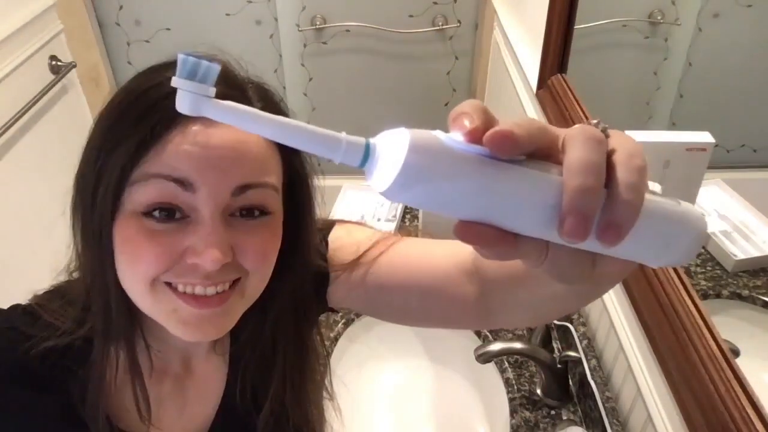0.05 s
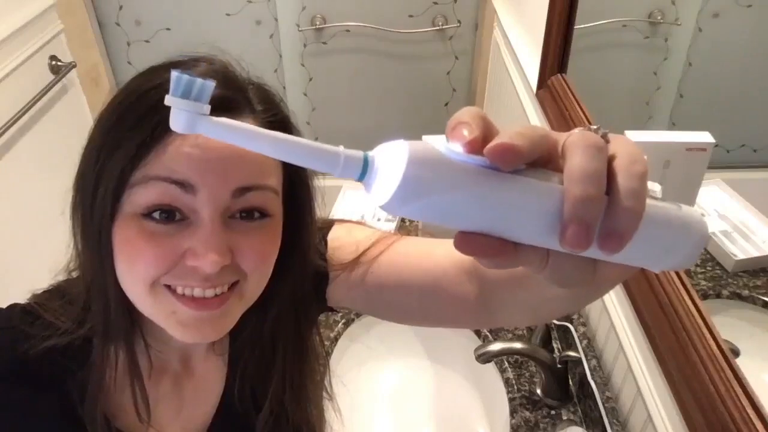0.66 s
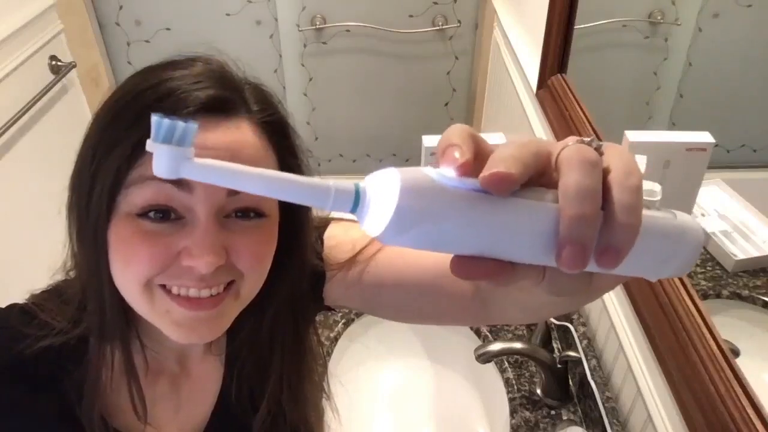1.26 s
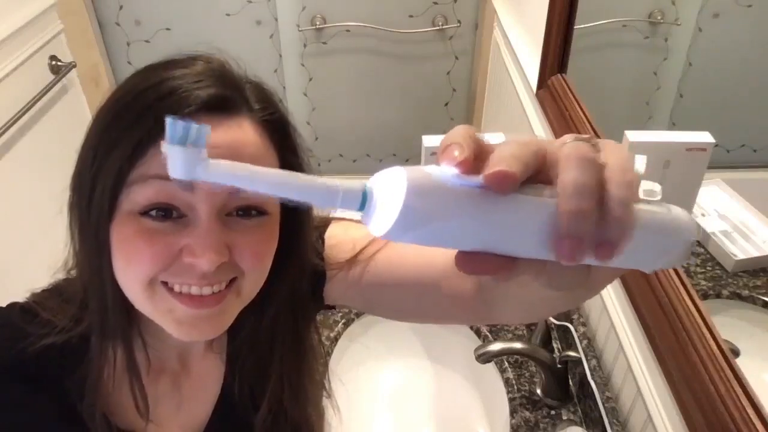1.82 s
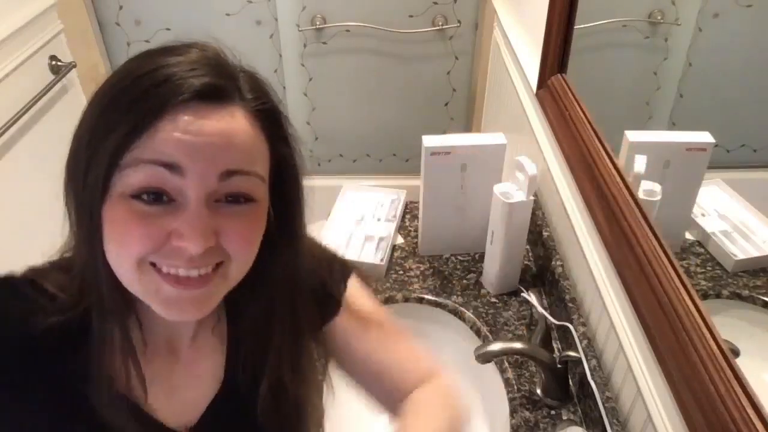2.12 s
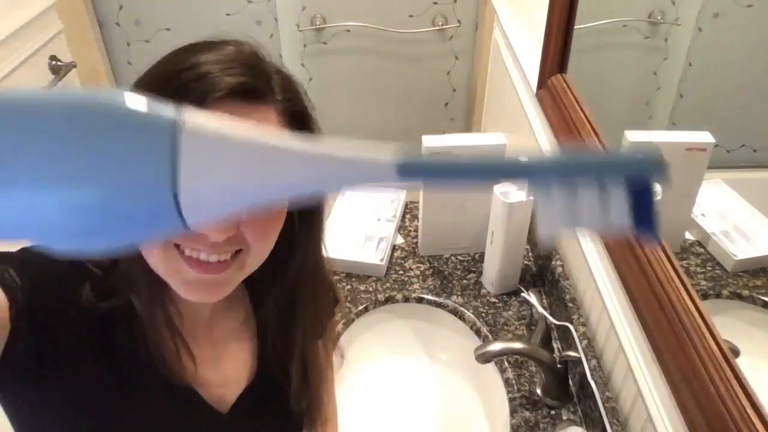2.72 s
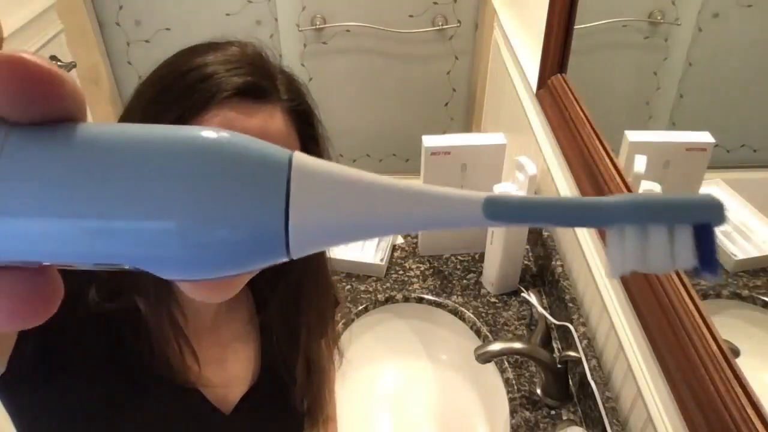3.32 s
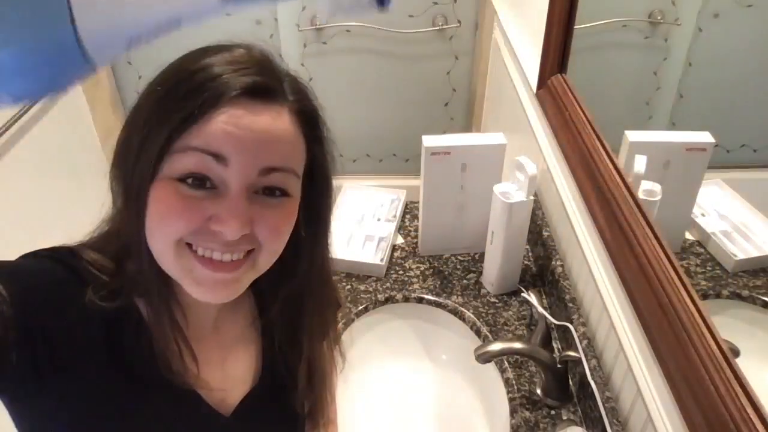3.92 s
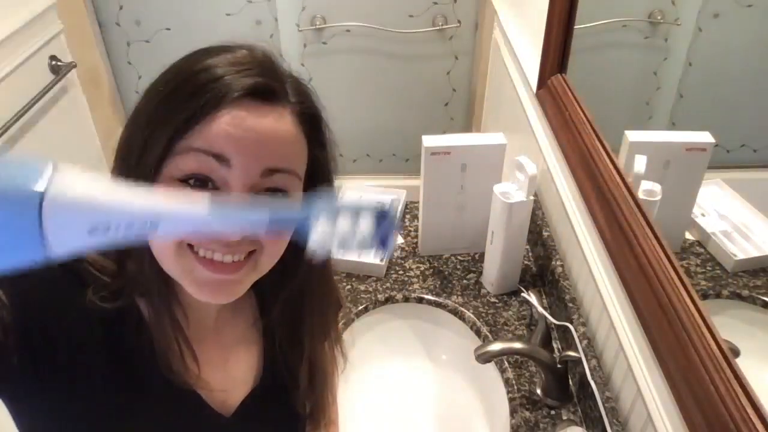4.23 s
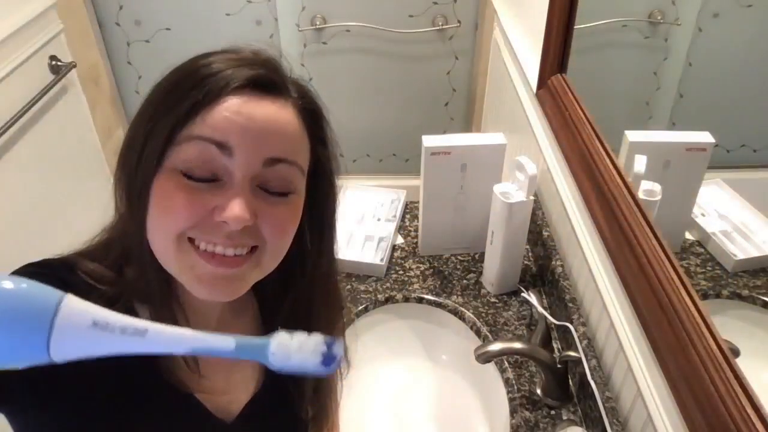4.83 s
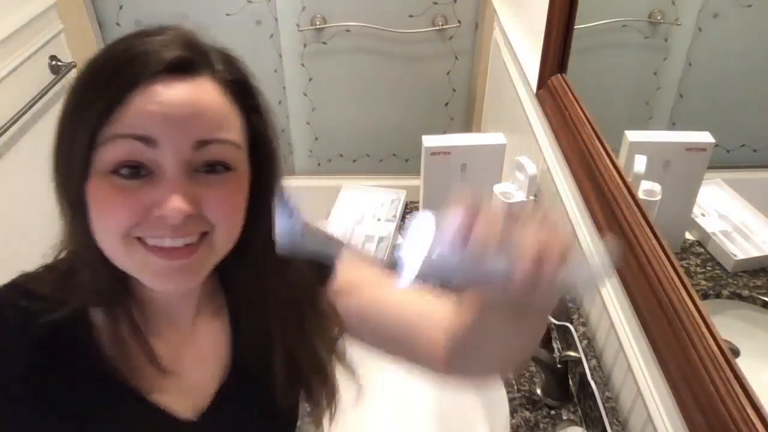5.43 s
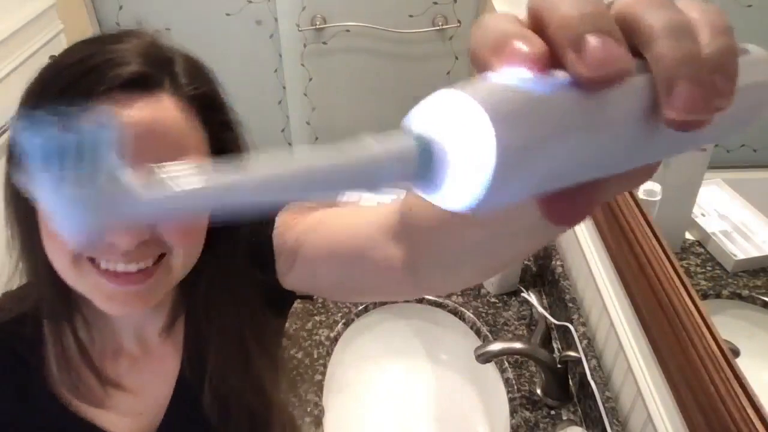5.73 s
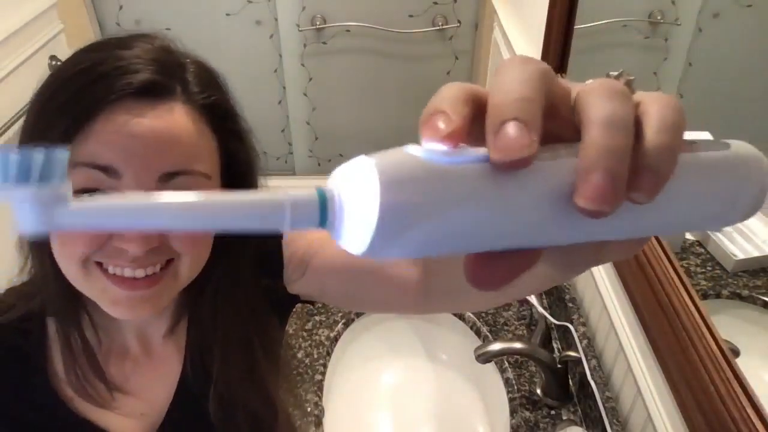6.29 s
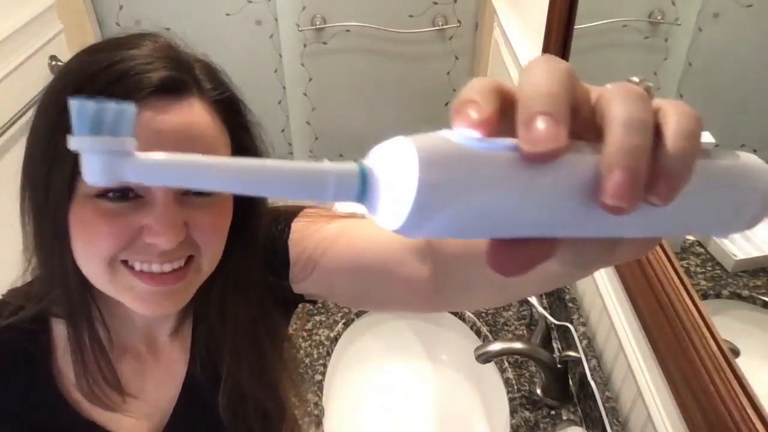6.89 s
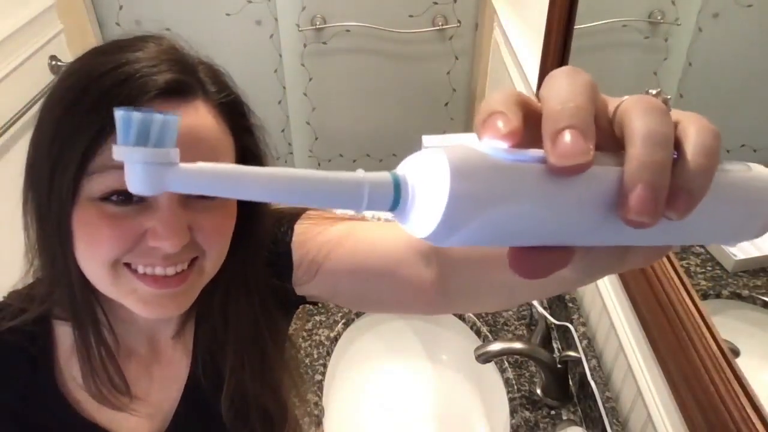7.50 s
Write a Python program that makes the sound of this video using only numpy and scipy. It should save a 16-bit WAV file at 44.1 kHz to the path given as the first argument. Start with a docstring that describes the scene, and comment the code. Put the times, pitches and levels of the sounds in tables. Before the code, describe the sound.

Two electric toothbrushes run throughout in a small tiled bathroom, over a faint low rumble. From the start, one is close to the microphone, giving a loud, even buzz made of very fast rattling and clicking, with a motor hum and a slight throb. At about 2 seconds it is lowered and becomes much quieter, duller and more echoing. From about 2.3 seconds the second toothbrush comes forward with a thin, high whine, softer than the first brush. Its pitch holds steady, but its tone shifts as it is moved, sharpest around 4 seconds, with a brief dip just after. The first brush keeps buzzing behind it. At about 5.4 seconds the whine recedes and the rattling brush swells back. By about 5.8 seconds it is closer, fuller and louder than at first, and it continues until the end, near 7.5 seconds.

```python
"""A small tiled bathroom: two electric toothbrushes run over a low rumble and take turns up close.
A geared brush rattles, clicks and hums as teeth, shaft and head knock and ring its casing; its motor
turns 25 times to 11 turns of the crown wheel, so the rattle throbs. It is lowered while a sonic brush
is held up, whining mainly on the odd harmonics of its magnetic drive, and then comes back closer."""
import sys
import numpy as np
from scipy import signal
from scipy.fft import rfft, irfft
from scipy.io import wavfile
from scipy.ndimage import map_coordinates

SR = 44100
rng = np.random.default_rng(int(sys.argv[2]) if len(sys.argv) > 2 else 0)


def dump(signal):
    """Clip the signal to [-1, 1] and save it as 16-bit WAV at the path in sys.argv[1]."""
    limited = np.clip(np.atleast_2d(signal).T, -1, 1)
    pcm = np.round(limited * 32767).astype(np.int16)
    wavfile.write(sys.argv[1], SR, pcm)


N = 332955
TIME = np.arange(N) / SR

PINION_TEETH, CROWN_TEETH = 11, 25
GEAR_RATIO = CROWN_TEETH / PINION_TEETH  # motor turns per crown turn
# tooth load where the head reverses: (crown angle [turns], width [turns], strength [ratio])
REVERSALS = [(.93, 0.18, 0.73), (.47, 0.18, 0.28)]


def amp(db):
    """Decibels to gain."""
    return 10 ** (np.asarray(db) / 20)


def unit_rms(x):
    """Scales to rms 1."""
    return x / np.sqrt(np.mean(x ** 2) + 1e-20)


def at_hz(table, hz):
    """Interpolates a (frequency, value) table on a log axis."""
    table_hz, value = np.transpose(table)
    return np.interp(np.log(hz + 1), np.log(table_hz + 1), value)


def cut(x, hz, kind, order=2):
    """Butterworth low-pass or high-pass."""
    return signal.sosfilt(signal.butter(order, hz, kind, fs=SR, output="sos"), x)


def resonance(x, hz, width_hz):
    """Two-pole band-pass."""
    return signal.lfilter(*signal.iirpeak(hz, hz / width_hz, SR), x)


def ringing(blows, hz, width_hz):
    """Blows through a steep resonance, at rms 1."""
    return unit_rms(resonance(resonance(blows, hz, width_hz), hz, width_hz))


def colour(x, spectrum, modes, size=4096):
    """Minimum-phase filter, broad spectrum plus narrow modes: rings after a tap, never before."""
    bin_hz = abs(np.fft.fftfreq(size, 1 / SR))
    modes_db = sum(db / (1 + (2 * (bin_hz - hz) / width_hz) ** 2) for hz, width_hz, db in modes)
    log_gain = np.log(amp(at_hz(spectrum, bin_hz) + modes_db))
    response = np.fft.ifft(np.exp(np.conj(signal.hilbert(log_gain)))).real
    return signal.oaconvolve(x, response[:size // 2])[:N]


def drift(hz, size=1024):
    """Slow noise of rms 1, up to about hz."""
    bin_hz = np.fft.rfftfreq(size, TIME[-1] / size)
    slow = irfft(rfft(rng.standard_normal(size)) / (1 + (bin_hz / hz) ** 4))
    return np.interp(TIME, np.linspace(0, TIME[-1], size), unit_rms(slow))


def move(at_s, length_s):
    """Hand movement from 0 to 1, half done at at_s."""
    return np.clip((TIME - at_s) / length_s + .5, 0, 1)


def swell(at_s, width_s):
    """Gaussian rise to 1 and back."""
    return np.exp(-.5 * ((TIME - at_s) / width_s) ** 2)


def crossings(turns):
    """Times [s] at which a rising phase passes whole turns."""
    return np.interp(np.arange(1, int(turns[-1])), turns, TIME)


def taps(times_s, forces, size=8):
    """Band-limited impulses at exact times."""
    centre = times_s[:, None] * SR
    index = np.floor(centre).astype(int) + np.arange(1 - size, size + 1)
    pulses = forces[:, None] * np.sinc(index - centre) * np.sinc((index - centre) / size)
    return np.bincount(np.clip(index, 0, N - 1).ravel(), pulses.ravel(), N)


def bumps(turns, rows):
    """Gaussian peaks at set angles of a wheel."""
    return sum(strength * np.exp(-.5 * (((turns - at + .5) % 1 - .5) / width) ** 2)
               for at, width, strength in rows)


def room_tone(rumble_db=-59, hum_hz=59.2, hum_db=-70):
    """Low rumble with a faint steady hum."""
    # rumble spectrum: (frequency [Hz], relative level [dB])
    spectrum = [(20, -25), (35, -18), (48, -2), (65, 3.5), (90, -9), (125, -9.5), (170, -15.5), (220, -20),
                (300, -11.5), (500, -13.5), (900, -14.5)]
    gain = amp(at_hz(spectrum, np.fft.rfftfreq(N, 1 / SR)))
    rumble = irfft(rfft(rng.standard_normal(N)) * gain, N)
    hum = np.sqrt(2) * np.sin(2 * np.pi * (hum_hz * TIME + rng.random()))
    return amp(rumble_db) * unit_rms(cut(rumble, 800, "low")) + amp(hum_db) * hum


def bathroom(x, gap_s=.004, size=20000):
    """Dense tail from tiles and mirror, each band dying at its own rate."""
    # room decay: (frequency [Hz], T60 [s])
    t60 = [(300, 0.12), (2000, 0.76), (7000, 0.17), (15000, 0.21)]
    noise = rng.standard_normal(size) * (np.arange(size) > gap_s * SR)
    hz, age_s, bands = signal.stft(noise, SR, nperseg=256)
    tail = signal.istft(bands * amp(-60 * age_s / at_hz(t60, hz)[:, None]), SR, nperseg=256)[1]
    return signal.oaconvolve(x, tail / np.linalg.norm(tail))[:N]


def counter_echo(x, near, near_s=.00095, far_s=.000606, peak_gain=.43, dull_hz=3500):
    """The counter's echo makes a sliding comb, strongest halfway through a move."""
    delay_s = near * near_s + (1 - near) * far_s
    gain = peak_gain * 2 * np.sqrt(np.clip(near * (1 - near), 0, 1))
    echo = map_coordinates(cut(x, dull_hz, "low", order=1), [(TIME - delay_s) * SR], order=2)
    return (x + gain * echo) / np.sqrt(1 + gain ** 2)


def sonic_brush(drive_hz=264.15, move_s=.17, aside_fifth_db=-63, aside_seventh_db=-69, aside_db=-3,
                flutter=.21, flutter_hz=60, bristle_db=-69):
    """A steady magnetic drive whines; each hold of the hand beams its partials differently."""
    # holds: (start [s], end [s], 5th harmonic [dB], 7th harmonic [dB], bristles facing [0-1])
    holds = [(2.21, 2.34, -55, -58, 0), (2.35, 3.742, -55.3, -48.6, 0.5), (3.743, 4.286, -60, -45.5, 0.4),
             (4.428, 5.396, -60, -51.6, 1)]
    # weaker partials: (harmonic [number], side-on [dB], bristles facing [dB])
    weak_partials = [(2, -68.5, -69.5), (3, -80, -69), (9, -61.5, -62.5), (11, -60.5, -67),
                     (13, -69.5, -76), (15, -88, -79), (17, -79, -82), (27, -82, -74), (29, -84, -83),
                     (31, -77, -84)]
    turns = drive_hz * TIME + .0047 * drift(hz=2.8)
    held = np.array([move(start_s, move_s) - move(end_s, move_s) for start_s, end_s, *_ in holds])
    _, _, fifth_db, seventh_db, hold_facing = np.transpose(holds)
    aside = 1 - held.sum(0)
    facing = hold_facing @ held
    main = [(5, amp(fifth_db) @ held + amp(aside_fifth_db) * aside),
            (7, amp(seventh_db) @ held + amp(aside_seventh_db) * aside)]
    partials = [(harmonic, gain * amp(.33 * drift(hz=3.7))) for harmonic, gain in main]
    for harmonic, side_db, front_db in weak_partials:
        level_db = (1 - facing) * side_db + facing * front_db + aside_db * aside
        partials.append((harmonic, amp(level_db + .5 * drift(hz=5.5))))
    whine = sum(gain * np.sin(2 * np.pi * (harmonic * turns + rng.random()))
                for harmonic, gain in partials)
    whine *= 1 + flutter * unit_rms(cut(rng.standard_normal(N), flutter_hz, "low"))
    # bristles swish twice a cycle, through the neck's resonance
    friction = rng.standard_normal(N) * np.sin(2 * np.pi * turns) ** 2
    swish = unit_rms(resonance(friction, hz=1900, width_hz=350))
    return np.sqrt(2) * whine + amp(bristle_db + aside_db * aside) * swish


def handle_hum(crown, near, turned, turned_db=3.5):
    """Tones at sums of motor and crown orders; turning the handle lifts the upper motor orders."""
    # hum tones: (motor order [number], crown order [number], held up [dB], lowered [dB])
    tones = [(0, 2, -61, -59.5), (1, 0, -67, -88), (0, 4, -67, -67.5), (1, 2, -70.5, -86),
             (2, 0, -63.5, -69.5), (0, 5, -69, -69), (2, 1, -64.5, -70), (0, 6, -65, -80),
             (1, 4, -70, -79.5), (3, -2, -79, -72), (3, 0, -68.5, -77), (2, 3, -60.5, -66),
             (0, 8, -63, -67), (2, 4, -60.5, -68), (4, 0, -61.5, -74), (2, 5, -60.5, -71), (5, 0, -60, -75),
             (0, 12, -69, -72), (4, 3, -68, -71), (5, 2, -60, -66.5), (6, 1, -59, -82), (7, 2, -52.5, -71),
             (9, 0, -54, -95), (9, 1, -62, -78), (7, 0, -59, -82), (7, -1, -57.5, -82), (8, 1, -64, -83)]
    hum = np.zeros(N)
    for motor_order, crown_order, up_db, down_db in tones:
        level_db = near * up_db + (1 - near) * down_db + turned_db * turned * (motor_order > 1)
        turns = (motor_order * GEAR_RATIO + crown_order) * crown
        hum += amp(level_db + drift(hz=2.5)) * np.sin(2 * np.pi * (turns + rng.random()))
    return np.sqrt(2) * hum


def head_clacks(crown, motor_at_turns=.86, scatter_db=1.2, jitter_s=.00004):
    """The loose head clacks when a motor stroke falls on a reversal."""
    times_s = crossings(crown * GEAR_RATIO - motor_at_turns)
    scatter, late = rng.standard_normal((len(times_s), 2)).T
    angle = np.interp(times_s, TIME, crown)
    force = bumps(angle, [(.95, .045, 1), (.47, .025, .55)]) * amp(scatter_db * scatter)
    return ringing(taps(times_s + jitter_s * late, force), hz=2150, width_hz=900)


def head_thumps(crown, idle=.25, sway_at=.885, lead_s=.0013, sway_s=.0006, spread=.11,
                jitter_s=.00005, wear_s=.00011):
    """The head thumps at each end of its swing, hardest when the eccentric pushes the same way."""
    blows = np.zeros(N)
    for at, _, strength in REVERSALS:
        times_s = crossings(crown - at)
        eccentric_rad = 2 * np.pi * (2 * np.interp(times_s, TIME, crown) * GEAR_RATIO - sway_at)
        scatter, late = rng.standard_normal((len(times_s), 2)).T
        force = strength * (idle + np.clip(2 * np.cos(eccentric_rad), 0, 1)) * (1 + spread * scatter)
        slip_s = wear_s * np.resize(rng.standard_normal(PINION_TEETH), len(times_s))  # same each round
        early_s = lead_s + sway_s * np.sin(eccentric_rad)
        blows += taps(times_s + slip_s - early_s + jitter_s * late, force)
    return ringing(blows, hz=1045, width_hz=420)


def shaft_clicks(crown, idle=.096, scatter_db=.9, jitter_s=.000164, burst_s=.0013):
    """The eccentric knocks the slack shaft, hardest at reversals: snaps and chatter over rubbing."""
    # knocks: (crown angle [turns], width [turns], motor angle [turns], strength [ratio])
    slack = [(0.5, 0.044, .26, 1.1), (.89, .037, .74, .92), (.99, .05, .27, 0.76), (.46, 0.043, .02, .45),
             (0.4, .05, .71, 0.43)]
    motor = crown * GEAR_RATIO
    knocks = np.zeros(N)
    for at, width, motor_at, strength in slack:
        times_s = crossings(motor - motor_at)
        scatter, late = rng.standard_normal((len(times_s), 2)).T
        reversal = bumps(np.interp(times_s, TIME, crown), [(at, width, 1)])
        force = strength * (idle + reversal) * amp(scatter_db * scatter)
        knocks += taps(times_s + jitter_s * late, force)
    bursts = signal.lfilter([1], [1, -np.exp(-1 / (burst_s * SR))], knocks) * rng.choice([-1, 1], N)
    chatter = unit_rms(cut(bursts, 17000, "low", order=1))
    snaps = ringing(knocks, hz=7100, width_hz=1700)
    # the motor beats against the head's two strokes
    beat = 1 + .023 * np.cos(2 * np.pi * (motor - 2 * crown - .17))
    rubbing = unit_rms(rng.standard_normal(N) * (2.1 + bumps(crown, REVERSALS)) * beat)
    return .95 * chatter + .3 * snaps + 1.35 * rubbing


def gear_teeth(crown, load=1.35, sway=.3, sway_at=.47, wear_teeth=.608, spread=.19, jitter_s=.00003):
    """Each meeting of two teeth is a tap; the same pairs recur with the same flaws."""
    times_s = crossings(crown * CROWN_TEETH)
    angle = np.interp(times_s, TIME, crown)
    mesh = np.arange(len(times_s))
    pair = mesh % PINION_TEETH, mesh % CROWN_TEETH
    flaw = rng.standard_normal((PINION_TEETH, CROWN_TEETH))
    flank = rng.choice([-1, 1], flaw.shape)  # front or back of the gap
    scatter, late = rng.standard_normal((len(times_s), 2)).T
    # the motor's eccentric loads the teeth twice a turn
    eccentric = 1 + sway * np.cos(2 * np.pi * (2 * angle * GEAR_RATIO - sway_at))
    force = (1 + load * bumps(angle, REVERSALS)) * eccentric * (flank[pair] + spread * scatter)
    mesh_hz = crown[-1] / TIME[-1] * CROWN_TEETH
    offset_s = wear_teeth * flaw[pair] / mesh_hz
    return unit_rms(taps(times_s + offset_s + jitter_s * late, force))


def casing(blows, level_db, near, turned, split_hz, kind, wet_near, wet_far):
    """Blows ring the casing; the farther the brush, the more of it arrives by the room."""
    # casing spectrum held up, turned and afar: (frequency [Hz], relative level [dB])
    up_spectrum = [(260, -63), (450, -18.5), (570, -11), (723, -10), (1000, -6.5), (1450, -8), (1540, -7),
                   (2160, -6), (3370, -13.5), (5030, -12.5), (5580, -13), (6760, -7.5), (10900, -19.2),
                   (12800, -20.3), (15500, -21)]
    turned_spectrum = [(260, -62.5), (450, -10), (530, -7.5), (723, -9.5), (767, -5.5), (876, -6),
                       (1000, -4.5), (1330, -4), (1450, -2.5), (1630, -4), (2160, -3.5), (2910, -7.5),
                       (3690, -13), (7280, -12), (15500, -22.5)]
    far_spectrum = [(300, -28), (450, -23), (570, -11), (700, -20.5), (800, -9), (990, -13.5), (1300, -10),
                    (1650, -11), (2200, -12), (2900, -11.5), (3600, -17), (5500, -24), (7070, -19.5),
                    (11000, -31.5), (15500, -37.5)]
    # handle and head modes: (frequency [Hz], width [Hz], held up [dB], turned [dB], afar [dB])
    modes = [(690, 90, 0.5, -1.5, -1), (776, 60, 2.5, 3, 1), (873, 52, 1.5, 0.5, 1),
             (983, 135, 2.5, 2.5, 5), (1406, 90, 2.5, 2.5, 0), (1563, 92, 0, -1, -3), (2190, 130, 2, 0, -1),
             (2630, 170, 0.5, -5, -0.5), (2890, 200, 2.5, 1.5, 0), (3800, 240, 2, -3.5, 0),
             (4500, 450, 0, 1.5, 0.5), (5050, 280, 6, 1, 0), (5600, 350, 0, -2.5, 0.5),
             (6070, 230, 2, 0, 0.5), (7190, 270, 1.5, 3, 4), (8800, 540, 2.5, 3, 4),
             (10080, 790, 2.5, 3, 4), (11000, 900, -3.5, 0, -2.5), (12900, 1400, 4, -1, 3),
             (13900, 600, 2, 3, 1.5)]
    band = cut(cut(blows, 424, "high", order=4), split_hz, kind, order=3)
    drive = counter_echo(band, near)
    up_sound, turned_sound, far_sound = (
        unit_rms(colour(drive, spectrum, [(hz, width_hz, db[pose]) for hz, width_hz, *db in modes]))
        for pose, spectrum in enumerate((up_spectrum, turned_spectrum, far_spectrum)))
    near_sound = (1 - turned) * up_sound + turned * turned_sound
    sound = amp(level_db) * (near * near_sound + (1 - near) * far_sound)
    wet = near * wet_near + (1 - near) * wet_far
    to_room = np.sqrt(wet) * sound
    return np.sqrt(1 - wet) * sound + np.std(to_room) * unit_rms(bathroom(to_room))


def colour_flares(x):
    """Brief peaks and dips brighten or dull narrow bands of the rattle."""
    # peaks and dips: (time [s], width [s], frequency [Hz], width [Hz], gain [dB])
    flares = [(1.0, .3, 14400, 600, 4), (2.028, .024, 7200, 600, 7), (2.08, .035, 2600, 200, 5),
              (2.13, .05, 2150, 220, -5), (2.15, .11, 11000, 1000, 3.5), (2.2, .13, 4150, 300, 4),
              (2.222, .027, 2500, 200, 5), (2.35, .05, 3450, 150, 8), (2.36, .06, 1510, 90, 5),
              (5.43, .09, 10300, 1800, 3), (5.47, .045, 2200, 200, -4), (5.48, .04, 4400, 250, 4.5),
              (5.5, .035, 1550, 140, 6), (5.55, .021, 7050, 450, 5), (5.65, .03, 7200, 700, 5),
              (5.782, .043, 1980, 260, 5), (2.26, .06, 700, 150, -5), (5.82, .06, 3850, 300, 6),
              (6.15, .2, 6600, 500, -3), (6.25, .25, 4600, 450, 2.2), (6.9, .39, 7250, 350, 2.6)]
    return x + sum((amp(db) - 1) * swell(at_s, width_s) * resonance(x, hz, width_hz)
                   for at_s, width_s, hz, width_hz, db in flares)


def geared_pose(relax_per_s=.22):
    """Nearness and twist, both 0-1: lowered, lifted again, turned by a wrist that slowly relaxes."""
    near = 1 - move(at_s=2.127, length_s=.31) + move(at_s=5.45, length_s=.43)
    turn_at_s = 5.74
    turned = move(turn_at_s, length_s=.25) * (1 - relax_per_s * np.maximum(TIME - turn_at_s, 0))
    return near, turned


def geared_brush(start_turns=.085, wander_turns=.0039, throb_depth=.067, throb_at=.73):
    """Tooth rattle, head thumps and clacks, shaft clicks and hum, all locked to one motor."""
    # crown wheel speed, sagging when lowered, surging when lifted: (time [s], speed [turns/s])
    crown_speed = [(0, 68.91), (1.25, 69.03), (2.1, 68.63), (3.9, 68.86), (5.2, 68.84), (5.5, 69.26),
                   (5.8, 68.86)]
    crown_hz = np.interp(TIME, *np.transpose(crown_speed))
    crown = start_turns + np.cumsum(crown_hz) / SR + wander_turns * drift(hz=6.3)
    near, turned = geared_pose()
    rattle_db = -48.5 + 9 * near + 3 * turned
    dip_db = swell(at_s=5.94, width_s=.13)  # the clicks dip briefly
    click_db = -54.5 + 10.5 * near - .26 * turned - dip_db
    # one swell per full round of the gears
    throb = 1 + throb_depth * np.cos(2 * np.pi * (crown / PINION_TEETH - throb_at))
    clicks = shaft_clicks(crown) * throb
    blows = gear_teeth(crown) + .18 * head_thumps(crown) + .065 * head_clacks(crown) + .24 * clicks
    rattle = casing(blows, rattle_db, near, turned, split_hz=3080, kind="low", wet_near=.19, wet_far=.76)
    ticks = casing(clicks, click_db, near, turned, split_hz=4000, kind="high", wet_near=.12, wet_far=.88)
    return colour_flares(rattle + ticks) + handle_hum(crown, near, turned)


def scene():
    """Both brushes over the room tone, mono."""
    return (geared_brush() + sonic_brush() + room_tone())[None]


def record(dry, edge_hz=15700):
    """Steep low-pass band limit."""
    low_pass = signal.firwin(1023, edge_hz, window=("kaiser", 9), fs=SR)
    return signal.oaconvolve(dry, low_pass[None], "same")


dry = scene()
out = record(dry)
dump(out)
```